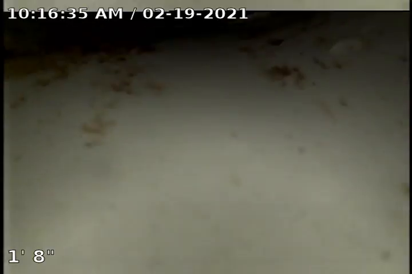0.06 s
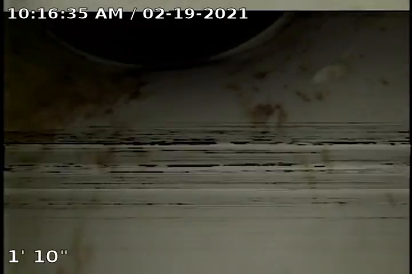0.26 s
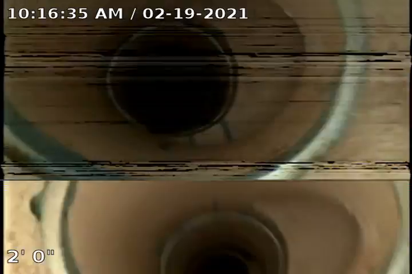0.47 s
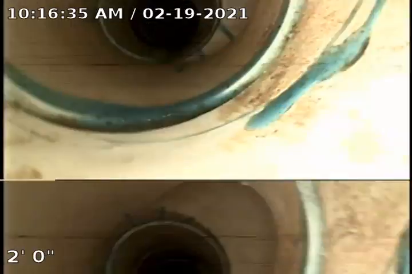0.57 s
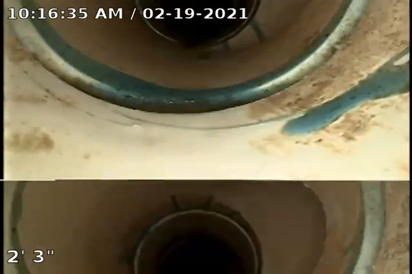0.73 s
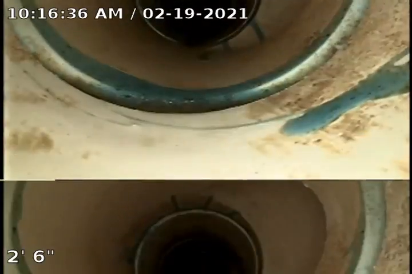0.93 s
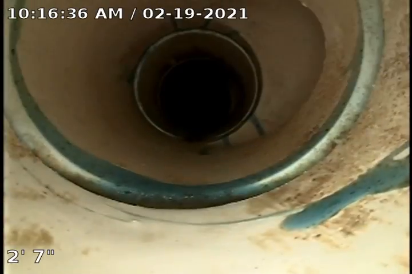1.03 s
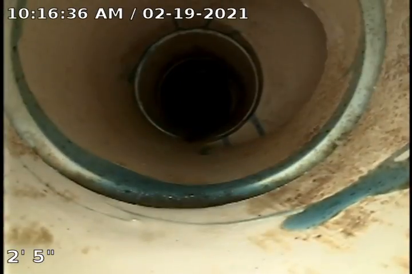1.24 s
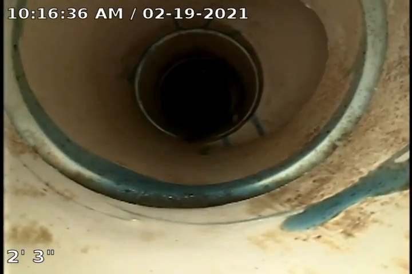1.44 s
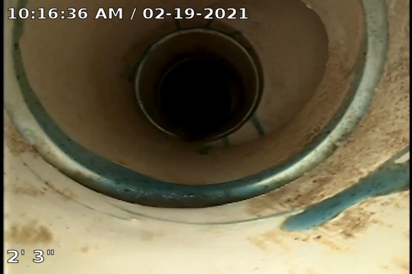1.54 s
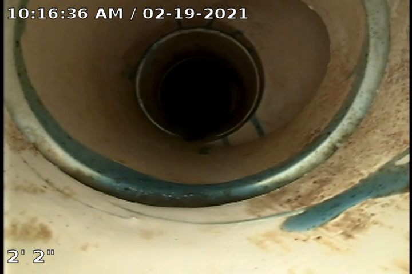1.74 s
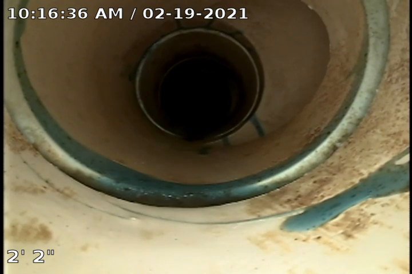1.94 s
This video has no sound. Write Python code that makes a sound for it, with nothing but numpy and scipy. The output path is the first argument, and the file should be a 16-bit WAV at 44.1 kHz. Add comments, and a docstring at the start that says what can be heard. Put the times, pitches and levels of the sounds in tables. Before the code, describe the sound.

A stiff cable clatters hard into a plastic drain pipe, then slides with a soft hiss

```python
"""In a small hard room, a stiff camera cable is shoved into a plastic drain pipe.
It scrapes over the rim and clatters against the fitting: bursts of tiny contacts with two ringing notes each.
Then it slides with a smooth hiss, bumps again and is drawn slowly back; these rubs are dense random slips.
Resonators ring as the pipe, a wavering sine hums as its air column, and fading noise makes the room's echoes.
"""
import sys
import numpy as np
from scipy import signal
from scipy.fft import rfft, irfft
from scipy.io import wavfile

SR = 44100
rng = np.random.default_rng(int(sys.argv[2]) if len(sys.argv) > 2 else 0)


def bounce(signal):
    """Save signal as a 16-bit WAV file at the path given by the first command-line argument."""
    frames = np.transpose(np.atleast_2d(signal))
    limited = np.clip(frames, -1, 1)
    pcm = np.round(limited * 32767).astype(np.int16)
    wavfile.write(sys.argv[1], SR, pcm)


N = 88200   # two seconds of samples
TIME = np.arange(N) / SR   # seconds


def from_db(db):
    """Turn decibels into a gain."""
    return 10 ** (np.asarray(db) / 20)


def rms_one(x):
    """Scale a sound so that its rms (average strength) is 1."""
    return x / np.sqrt(np.mean(x ** 2) + 1e-20)


def fade_60(t, t60):
    """A fade that loses 60 dB in t60 seconds."""
    return np.exp(-np.log(1000) * t / t60)


def level(rows):
    """Gain over time, drawn through points of seconds and dB."""
    return from_db(np.interp(TIME, *np.transpose(rows)))


def at_hz(points, hz):
    """Read a table between its points, on a logarithmic frequency axis."""
    table_hz, value = np.transpose(points)
    return np.interp(np.log(hz + 1), np.log(table_hz), value)


def colour(x, points, bumps=(), treble_db=0):
    """Equaliser without pre-echo: a spectrum, bumps of (Hz, octaves, dB) and a treble lift."""
    treble_hz = 2350   # half of the treble lift, in dB, is reached here
    size = 2 * len(x)
    hz = np.arange(size // 2 + 1) * SR / size
    high = 1 - 1 / (1 + (hz / treble_hz) ** 4)
    db = at_hz(points, hz) + treble_db * high
    for centre, octaves, lift in bumps:
        distance = np.log2((hz + 1) / centre) / octaves
        db = db + lift * np.exp(-.5 * distance ** 2)
    # folding the cepstrum forward gives a filter that only acts after its input
    cepstrum = irfft(np.log(from_db(db)))
    cepstrum[1:size // 2] *= 2
    cepstrum[size // 2 + 1:] = 0
    response = np.exp(rfft(cepstrum))
    return irfft(rfft(x, size) * response)[:len(x)]


def drift(rate):
    """Random wander: straight lines between random points, rate points per second."""
    points = rng.standard_normal(1000)
    return np.interp(TIME * rate, np.arange(len(points)), points)


def grains(per_s, spread_db, size):
    """Tiny clicks at random moments, of uneven strength and random sign."""
    strength = from_db(spread_db * np.minimum(rng.exponential(1, size), 4))
    happens = rng.random(size) < per_s / SR
    return happens * strength * rng.choice([-1, 1], size)


# The cable hitting the fitting. Each row: start in seconds, chatter strength in dB, body lift in dB,
# treble lift in dB, chatter decay in seconds, low note of the struck spot in Hz, its level in dB,
# high note in Hz, its level in dB, time for the notes to fall by 60 dB in seconds.
KNOCKS = [(0.078, -23.5, -10, 13.5, 0.032, 1512, -32, 3390, -50, .12),
          (0.170, -6, -18, 9, 0.018, 3063, -29, 3523, -30.5, .07),
          (0.2055, -3, 16.5, 3, 0.012, 366, -15.5, 680, -14.5, 0.046),
          (0.294, -7.5, -6, 1.5, 0.0038, 613, -19, 1310, -33, 0.04),
          (0.309, 3, -1.5, 6, 0.051, 403, -24, 2035, -23, 0.054),
          (0.328, -9, -2, 9, 0.0027, 468, -21, 1338, -21.5, 0.11),
          (0.3411, 2.5, -0.5, 16.5, 0.014, 2061, -11, 3080, -12.5, 0.046),
          (0.357, -7.5, 2, 16.5, 0.0041, 2783, -19, 3859, -19.5, 0.12),
          (0.386, -2, 1.5, -13, 0.0073, 1281, -15.5, 3246, -13, 0.023),
          (0.4257, 6.5, -10, -2, 0.00044, 1243, -3.5, 4030, -23, 0.025),
          (0.438, -3.5, 3, 15, 0.036, 1286, -21, 3610, -24, 0.076),
          (0.464, 12.5, -1, 2, 0.0033, 1291, -1, 1749, 0, 0.02),
          (0.474, -6, 16.5, -2, 0.0077, 823, -16, 3388, -14.5, 0.078),
          (0.514, 9, -8.5, 3, 0.0026, 1098, -8.5, 3960, -14.5, 0.03),
          (0.525, -1.5, 2.5, 12.5, 0.01, 1308, -9.5, 2060, -8.5, 0.032),
          (0.542, -17, -10, 12, 0.0035, 2045, -23, 2752, -12.5, 0.049),
          (0.6687, -2, 2.5, -5.5, 0.002, 629, -18, 1250, -28, 0.05),
          (0.682, -17, -8, 7, 0.0056, 538, -32, 868, -23.5, 0.049),
          (0.771, -23, -6, -18, 0.0037, 1189, -41, 1850, -37, 0.046),
          (0.812, -25, -12, 3, 0.002, 4000, -48, 5100, -49, .03),
          (1.321, -14, -2, -1, 0.0025, 1430, -34, 3680, -36, 0.045),
          (1.344, -16.5, 1.5, -13, 0.0055, 387, -46, 1077, -30.5, 0.053),
          (1.355, -15, -5.5, 0, 0.011, 893, -34, 1430, -37, .04)]
# The basic tone of a contact. Each row: frequency in Hz, level in dB.
CONTACT_COLOUR = [(40, -17.5), (100, -12), (180, 3), (290, 4.5), (430, 14), (650, 15), (1000, 12),
                  (1300, 18), (1700, 13), (2100, 10.5), (3200, 10), (5000, 0), (8000, -8), (11000, -21),
                  (13500, -33), (15300, -17.5)]


def knocks():
    """A knock is a first touch, a dying chatter, a shudder of the plastic wall and two ringing notes."""
    first_touch = 0.19   # single click, beside a chatter of energy 1
    chatter_per_s, chatter_spread_db, chatter_rise_s = 4000, 2, 0.0017
    shudder_db, shudder_decay_s = -19, 0.0096   # level is relative to the chatter
    body_hz, body_octaves = 420, 0.99
    note_rise_s = 0.00093
    size = 8192   # samples per knock
    t, out = TIME[:size], np.zeros(N + size)
    for s, db, body_db, treble_db, decay_s, low_hz, low_db, high_hz, high_db, t60 in KNOCKS:
        shudder = from_db(shudder_db) * np.exp(-t / shudder_decay_s)
        fall = np.exp(-t / decay_s) + shudder
        rise = 1 - np.exp(-t / chatter_rise_s)
        force = grains(chatter_per_s, chatter_spread_db, size) * fall * rise
        force /= np.sqrt(np.sum(force ** 2) + 1e-20)
        force[0] += first_touch
        body = [(body_hz, body_octaves, body_db)]
        chatter = from_db(db) * colour(force, CONTACT_COLOUR, body, treble_db)
        low_note = from_db(low_db) * np.sin(2 * np.pi * low_hz * t)
        high_note = from_db(high_db) * np.sin(2 * np.pi * high_hz * t)
        note_shape = (1 - np.exp(-t / note_rise_s)) * fade_60(t, t60)
        start = int(s * SR)
        out[start:start + size] += chatter + (low_note + high_note) * note_shape
    return out[:N]


def rubbing(pressure, spectrum, per_s, spread_db, judder_db, judder_rate):
    """Friction: dense slips whose strength judders under a pressure curve."""
    slips = grains(per_s, spread_db, N)
    judder = from_db(judder_db * np.tanh(drift(judder_rate)))
    return level(pressure) * rms_one(colour(slips * judder, spectrum))


# How hard the cable scrapes on the rim. Each row: time in seconds, level in dB.
SCRAPE_PRESSURE = [(0, -44), (.06, -41.5), (.14, -37.5), (.19, -34.5), (.23, -33), (.28, -36.5),
                   (.32, -34.5), (.41, -39), (.5, -35), (.59, -34.5), (.655, -41), (.73, -38.5),
                   (.8, -50.5), (.86, -47.5), (.96, -57.5), (1.03, -57), (1.17, -48.5), (1.28, -56),
                   (1.38, -48.5), (1.48, -64), (1.7, -60), (2, -68)]
# The tone of the scrape. Each row: frequency in Hz, relative level in dB.
SCRAPE_COLOUR = [(40, -36), (95, 2), (140, -6), (200, -0.5), (290, 1), (400, 1.5), (550, -1.5), (900, -5),
                 (1500, -5), (2100, -10), (3200, -11.5), (6000, -21), (10000, -42), (13500, -30),
                 (15300, -18.5)]


def scrape():
    """The cable catches and slips on the rim, giving a coarse scrape with strong judder."""
    return rubbing(SCRAPE_PRESSURE, SCRAPE_COLOUR, per_s=2900, spread_db=2, judder_db=4.0, judder_rate=110)


# How strongly the cable's jacket slides. Each row: time in seconds, level in dB.
SLIDE_PRESSURE = [(.8, -102), (.885, -54), (.93, -43), (1.0, -35.5), (1.08, -37.5), (1.17, -40),
                  (1.23, -46), (1.31, -47.5), (1.42, -55), (1.6, -94)]
# The tone of the slide. Each row: frequency in Hz, relative level in dB.
SLIDE_COLOUR = [(120, -32), (260, -7.5), (550, -0.5), (820, -25), (1300, -5), (1850, -27), (2150, -29),
                (2600, -4), (3050, -3.5), (3550, 4), (4200, 1.5), (5200, 1.5), (6500, -5.5), (8000, -3.5),
                (11000, -10.5), (13500, -8.5), (15300, -1.5)]


def slide():
    """The jacket slides smoothly: very many slips merge into a hiss."""
    return rubbing(SLIDE_PRESSURE, SLIDE_COLOUR, per_s=23000, spread_db=4.5, judder_db=2.2, judder_rate=89)


# How strongly the cable rubs as it is drawn back. Each row: time in seconds, level in dB.
PULL_PRESSURE = [(1.15, -91), (1.3, -49), (1.45, -50.5), (1.55, -48), (1.64, -49.5), (1.75, -51),
                 (1.85, -65), (2, -58)]
# The tone of the pull. Each row: frequency in Hz, relative level in dB.
PULL_COLOUR = [(100, -6), (190, -22), (400, 1), (800, -1), (1400, 0), (2100, -5), (3000, 2), (4500, -9.5),
               (7000, -21), (11000, -22), (15300, -29)]


def pull():
    """The cable is drawn back: quiet, fairly dense slips with little judder."""
    return rubbing(PULL_PRESSURE, PULL_COLOUR, per_s=10000, spread_db=4, judder_db=1.6, judder_rate=68)


# The ringing tones of the pipe. Each row: frequency in Hz, level in dB over the plain contact,
# time to fall by 60 dB in seconds.
PIPE_MODES = [(106.2, 3.5, 0.43), (187.6, 11, 0.18), (249, 12, 0.44), (303.5, 8, 0.34), (366.5, 0.5, 0.2),
              (437, -7, 0.45), (487.2, 3, 0.48), (571, 11, 0.45), (632, -4, 0.42), (800.4, 3.5, 0.18),
              (1064, -26, 0.16), (1190, -6, 0.28), (1282, -10.5, 0.15), (1603, -4, 0.11),
              (1730, -8.5, 0.22), (2773, -8, 0.12), (3100, -6, 0.09), (3503, 4.5, 0.13), (3835, -17, 0.21),
              (4830, -9, 0.11), (5200, -1.5, 0.1)]


def pipe(force):
    """The pipe wall and its air column resonate: each tone is a narrow filter driven by the contact."""
    out = 0
    for hz, db, t60 in PIPE_MODES:
        r = from_db(-60 / (t60 * SR))   # what is left of the ringing after one sample
        poles = [1, -2 * r * np.cos(2 * np.pi * hz / SR), r * r]
        ringing = signal.lfilter([1, 0, -1], poles, force + 1e-18)
        out = out + from_db(db) * (1 - r * r) / 2 * ringing
    return out


# The hum of the air in the pipe. Each row: time in seconds, level in dB.
HUM_LEVEL = [(0, -44), (.05, -56), (.16, -36.5), (.24, -28), (.3, -47), (.34, -60), (.37, -43), (.45, -37),
             (.5, -26), (.555, -50), (.6, -40), (.66, -45), (.72, -32), (.762, -38.5), (.81, -37.5),
             (.86, -64), (.98, -65), (1.03, -41), (1.078, -69), (1.12, -48), (1.22, -45), (1.3, -58),
             (1.37, -44), (1.44, -57), (1.5, -82)]


def air_column():
    """A low note of the pipe's air, kept going unevenly by the rubbing: a sine with wandering pitch."""
    hum_hz, wander_hz, waver_db = 189, 6, 2.5
    pitch = hum_hz + wander_hz * drift(30.5)
    phase = 2 * np.pi * np.cumsum(pitch) / SR
    waver = from_db(waver_db * drift(25.0))
    return np.sqrt(2) * level(HUM_LEVEL) * waver * np.sin(phase)


# How long the room's tail lasts. Each row: frequency in Hz, time to fall by 60 dB in seconds.
TAIL_T60 = [(150, 0.39), (500, 0.61), (1500, 0.46), (4000, 0.48), (12000, 0.3)]


def room(x):
    """Hard walls answer with dense close reflections and a tail whose highest treble dies first."""
    early_db, early_t60_s = -6, 0.08
    tail_db, tail_build_s, first_echo_s = -6.5, 0.0009, 0.0025
    hz = np.arange(N // 2 + 1) * SR / N
    centres = np.geomspace(100, 12800, 8)   # one band per octave
    white, tail = rfft(rng.standard_normal(N)), 0
    for centre, share in zip(centres, np.eye(len(centres))):
        band = irfft(white * np.interp(np.log(hz + 1), np.log(centres), share))
        tail = tail + band * fade_60(TIME, at_hz(TAIL_T60, centre))
    tail *= 1 - np.exp(-TIME / tail_build_s)
    early = rng.standard_normal(N) * fade_60(TIME, early_t60_s)
    echoes = from_db(early_db) * rms_one(early) + from_db(tail_db) * rms_one(tail)
    echoes = echoes * (TIME > first_echo_s) / np.sqrt(N)
    return signal.fftconvolve(x, echoes)[:N]


# The tone of the faint left-right spread. Each row: frequency in Hz, level in dB.
SPREAD_COLOUR = [(200, -21), (1000, -32.5), (3000, -23.5), (12000, -13.5)]


def stereo_spread(contact):
    """A faint, brighter left-right spread that follows the contacts, plus a little hiss."""
    hiss_db = -71
    smeared = room(contact)   # the contacts blurred by fading noise
    return colour(smeared, SPREAD_COLOUR) + from_db(hiss_db) * rng.standard_normal(N)


# The tone of the room air and microphone hiss. Each row: frequency in Hz, relative level in dB.
FLOOR_COLOUR = [(25, 1), (100, -1), (400, 8), (700, 1), (1500, 0.5), (4000, -0.5), (5400, -2), (5850, 5),
                (6300, 0), (9500, -12.5), (11200, -12.5), (11700, -0.5), (12500, -25), (15500, -7)]


def quiet_floor():
    """Room air and microphone hiss: steady coloured noise."""
    floor_db = -51.5
    return from_db(floor_db) * rms_one(colour(rng.standard_normal(N), FLOOR_COLOUR))


def scene():
    """Cable and pipe in the room, heard almost in mono over a quiet floor."""
    rubs = scrape() + slide() + pull()
    contact = knocks() + rubs
    floor = quiet_floor()
    mid = contact + pipe(contact) + room(contact) + air_column() + floor
    side = stereo_spread(contact)   # added on the left, subtracted on the right
    return np.array([mid + side, mid - side])


# The recorder's resting values. The two entries are the left and right offset, as parts of full scale.
OFFSET = [0.011, 0.015]


def record(dry):
    """The highest peaks are flattened, the top is cut, and the signal rests slightly off zero."""
    ceiling, cutoff_hz = .88, 15750   # the ceiling is a part of full scale
    limited = dry / (1 + (dry / ceiling) ** 6) ** (1 / 6)
    top_cut = signal.ellip(12, .1, 105, cutoff_hz, fs=SR, output="sos")
    return signal.sosfilt(top_cut, limited) + np.array(OFFSET)[:, None]


dry = scene()
out = record(dry)
bounce(out)
```